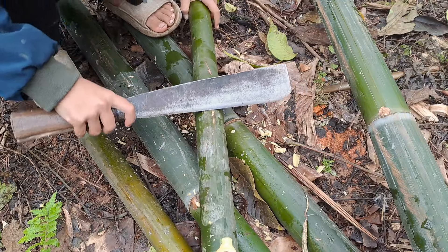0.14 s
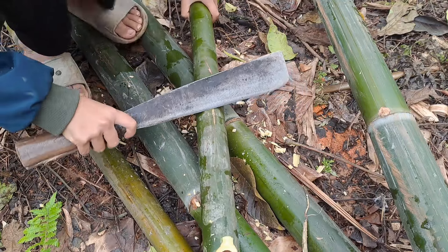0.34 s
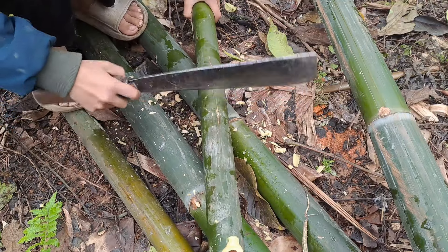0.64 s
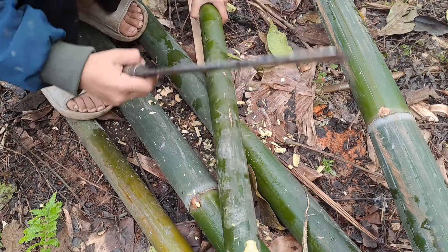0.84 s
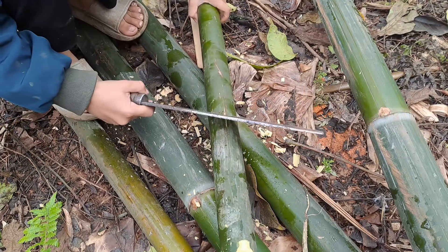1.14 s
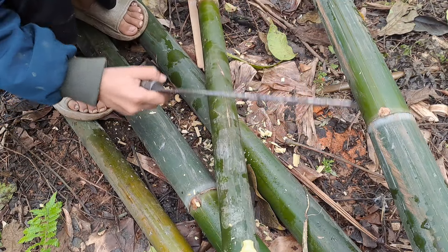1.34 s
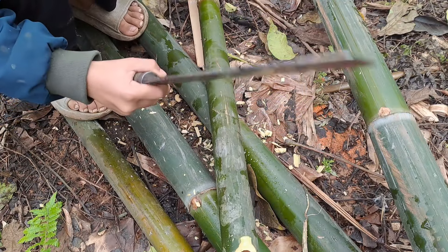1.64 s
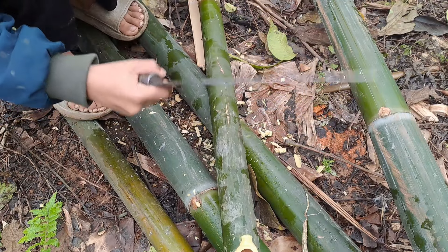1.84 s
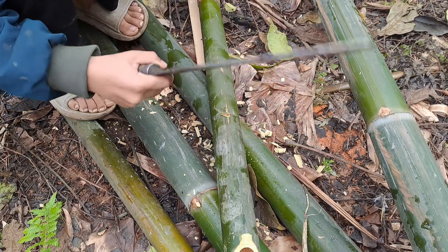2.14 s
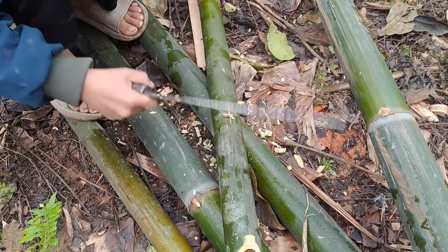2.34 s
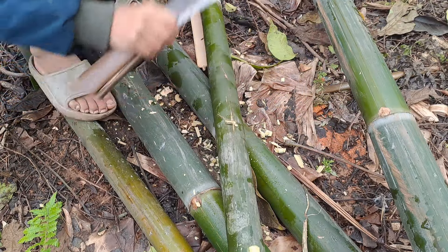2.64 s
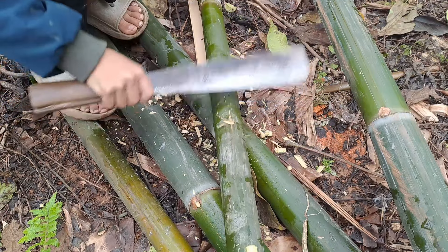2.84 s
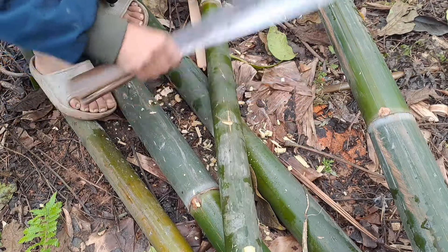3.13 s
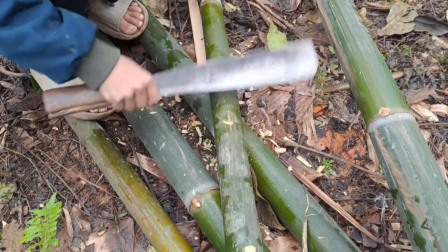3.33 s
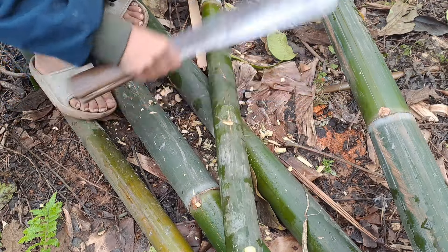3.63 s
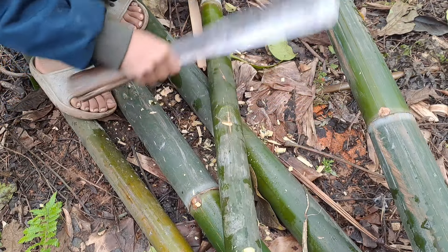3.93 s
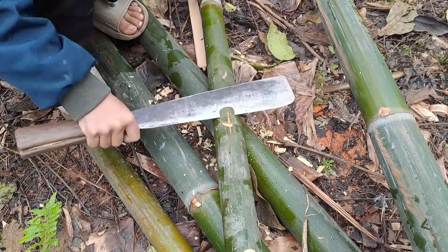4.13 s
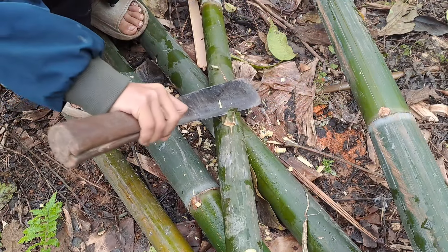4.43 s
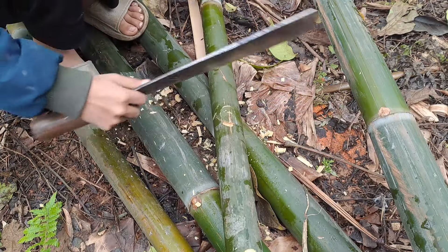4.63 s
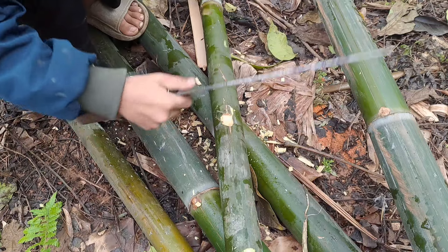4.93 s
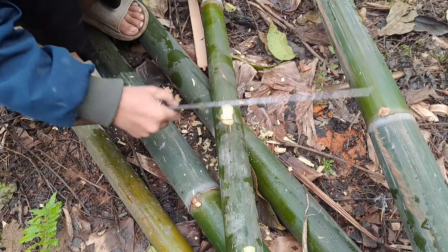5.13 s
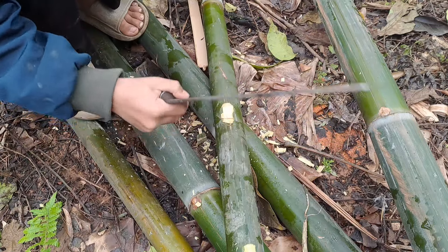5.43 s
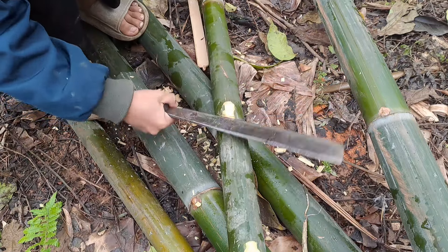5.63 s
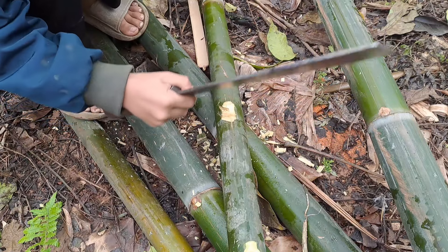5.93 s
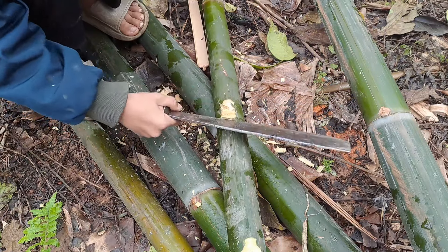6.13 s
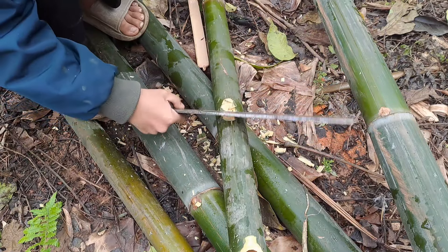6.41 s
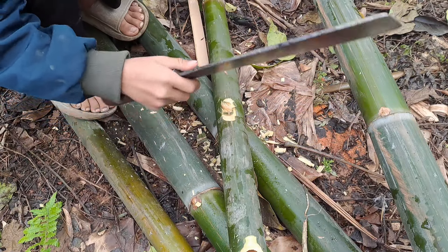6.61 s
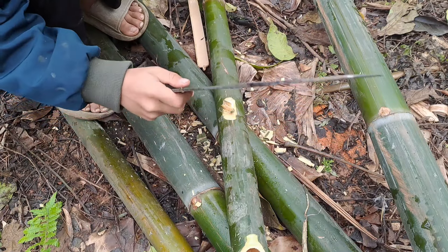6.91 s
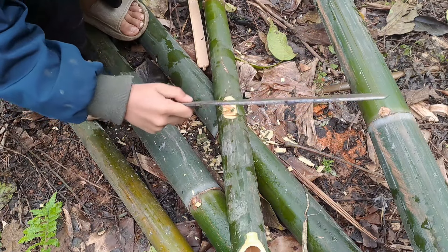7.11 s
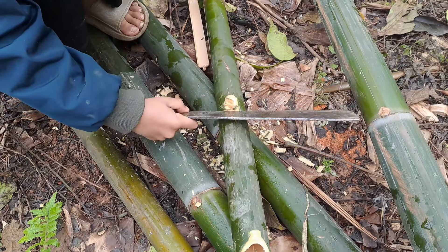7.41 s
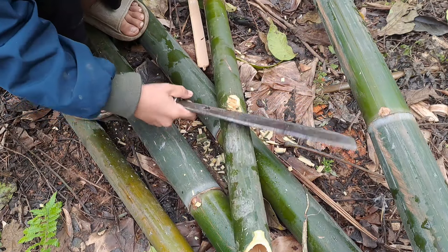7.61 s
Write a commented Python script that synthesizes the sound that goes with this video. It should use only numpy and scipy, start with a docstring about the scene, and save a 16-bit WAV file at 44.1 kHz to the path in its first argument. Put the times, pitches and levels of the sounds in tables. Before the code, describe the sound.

Close outdoor chopping on leafy ground. After a second of faint sleeve rustle, dull rubs, a soft low bump and small ticks, a machete strikes a green bamboo pole in fast runs of sharp, hollow, splintering knocks. Brief pauses bring bright blade scrapes and snapping chips. The last three blows are crisp and loud. The microphone is near, in stereo, with very quiet air and almost no echo.

```python
"""On leafy ground outdoors, close by, a machete chops a notch into a green bamboo pole lying on others.
Each blow is a swelling noise rush, a minimum-phase crack, damped modes of the hollow wall, a low hum
and decaying splinter noise. Between blows, shaped noise gives rubs, scrapes and ticking chips.
Soft cloth noise and very quiet air lie beneath."""
import sys
import numpy as np
from scipy import signal
from scipy.fft import rfft, irfft
from scipy.io import wavfile

SR = 44100
rng = np.random.default_rng(int(sys.argv[2]) if len(sys.argv) > 2 else 0)


def persist_wave(psi):
    """Save psi, clipped to +-1, as 16-bit WAV."""
    counts = np.round(np.clip(psi, -1, 1) * 32767).astype(np.int16)
    wavfile.write(sys.argv[1], SR, np.atleast_2d(counts).T)


N = 342216  # samples in the scene
SPAN = 2 ** 14  # samples in one event
AGE = np.arange(SPAN) / SR  # seconds since the event began
TOUCH_DB = 3.1  # scale of the unevenness of the dense resonances


def undb(db):
    """Logarithmic level: decibels become an amplitude gain."""
    return np.exp(np.log(10) / 20 * np.asarray(db))


def unit(x):
    """Power normalisation: scale to rms 1."""
    return x / np.sqrt(np.mean(x ** 2))


def fade(t60):
    """Exponential damping: the level falls 60 dB in t60 seconds."""
    return np.exp(-np.log(1000) * AGE / max(t60, 1e-3))


def bins(size):
    """Discrete spectrum: its frequencies in Hz, kept above zero for logarithms."""
    return np.maximum(np.arange(size // 2 + 1) * SR / size, 1)


def outline(points, size, tilt_db=0):
    """Spectral envelope: gain interpolated over octaves, plus a tilt in dB per octave."""
    hz, db = np.transpose(points)
    octave = np.log2(bins(size))
    return undb(np.interp(octave, np.log2(hz), db) + tilt_db * octave)


def noise(points, tilt_db=0, size=SPAN, alike_hz=650):
    """Interaural coherence: coloured noise alike at both ears in the bass, unrelated in the treble."""
    mid, side = rfft(rng.standard_normal((2, size))) * outline(points, size, tilt_db)
    side = side / np.sqrt(1 + (alike_hz / bins(size)) ** 2)
    return unit(irfft([mid + side, mid - side], size))


def grain(rate_hz, depth_db):
    """Random amplitude modulation: a gain that wanders unevenly between random levels."""
    steps = np.arange(SPAN // 8)
    level_db = depth_db * np.interp(AGE * rate_hz, steps, rng.standard_normal(len(steps)))
    return unit(undb(level_db))


def ripple(x, width_hz, depth_db):
    """Modal overlap: dense resonances of blade and pole, different at every point of contact."""
    peaks = rng.standard_normal((2, SPAN // 8))
    shape = np.array([np.interp(bins(SPAN) / width_hz, np.arange(len(p)), p) for p in peaks])
    # each ear hears its own pattern and part of the other's
    heard = (shape + np.sum(shape, axis=0)) / 2
    return unit(irfft(rfft(x) * undb(depth_db * heard), SPAN))


def resonate(x, hz, lift_db=6, width_hz=160):
    """Resonance: lift one narrow band."""
    band = 1 / (1 + 2j * (bins(SPAN) - hz) / width_hz)
    return unit(irfft(rfft(x) * (1 + (undb(lift_db) - 1) * band), SPAN))


def ring(hz, t60, build_s=0.0041):
    """Damped oscillation: a low resonance of the pole that takes a moment to build up."""
    return np.sin(2 * np.pi * hz * AGE) * fade(t60) * (1 - np.exp(-AGE / build_s))


def delayed(x, s):
    """Propagation delay: the same sound s seconds later."""
    return np.interp(AGE - s, AGE, x, left=0)


def add(out, s, sound):
    """Superposition: mix a sound in at time s."""
    start = int(round(s * SR))
    a, b = max(start, 0), min(start + SPAN, N)
    out[:, a:b] += sound[..., a - start:b - start]


# colour of the outdoor air: pitch_hz [Hz], level_db [dB per Hz, relative]
AIR_COLOUR = [(30, -19.5), (70, -4.5), (160, 1), (600, -16), (1500, -10), (3000, -18), (5200, -9.5),
              (8000, -18), (12000, -21.5), (16000, -26.5)]


def air(level_db=-74.5):
    """Stationary random noise: the very quiet outdoor air."""
    return undb(level_db) * noise(AIR_COLOUR, size=N)


# swishes as the arm reaches or changes grip: middle_s [s], fall to 1/e on either side_s [s], level_db [dB]
SLEEVE_MOVES = [(0.22, 0.27, -67.5), (1.0, 0.51, -67), (3.188, 0.07, -67), (4.28, 0.33, -63),
                (4.88, .17, -66.5), (6.25, 0.56, -71), (7.15, .08, -67.5), (7.7, .08, -63)]
# colour of the cloth: pitch_hz [Hz], level_db [dB per Hz, relative]
CLOTH_COLOUR = [(100, -12.5), (1400, -4.5), (3000, -8), (5400, -2.5), (8000, -7), (16000, -10)]


def sleeve():
    """Friction noise: cloth under Gaussian swells, one for each move of the arm."""
    t = np.arange(N) / SR
    swells = 0
    for s, side_s, db in SLEEVE_MOVES:
        swells = swells + undb(db) * np.exp(-np.minimum(((t - s) / side_s) ** 2, 20))
    return swells * noise(CLOTH_COLOUR, size=N)


# colour of scrapes and snaps: pitch_hz [Hz], level_db [dB per Hz, relative, before the tilt]
SCRAPE_COLOUR = [(60, -21.5), (200, -10), (400, -4.5), (750, -3), (1700, -4), (2500, -6.5), (4000, -8),
                 (6800, -10), (9000, -14.5), (12500, -13.5), (16000, -23.5)]


def strokes(rows):
    """Frictional excitation: gritty strokes, each with a sech swell of its length at half height."""
    out, middle = np.zeros((2, N)), AGE[-1] / 2
    for s, length, db, tilt in rows:
        grit = grain(4000, 4.5) * grain(300, 2.5)
        stroke = ripple(noise(SCRAPE_COLOUR, tilt), width_hz=190, depth_db=TOUCH_DB) * grit
        swell = 1 / np.cosh(2.59 * (AGE - middle) / length)
        add(out, s - middle, undb(db) * stroke * swell)
    return out


# dull rubs of the pole on its neighbours and the leaves: middle_s [s], length_s [s], level_db [dB]
POLE_RUB_STROKES = [(0.109, 0.045, -61.5), (0.244, 0.023, -56), (.333, 0.033, -45.5), (0.459, 0.057, -52),
                    (0.52, 0.027, -53.5), (0.76, 0.043, -41), (0.82, 0.043, -41), (1.066, 0.029, -59),
                    (1.297, 0.03, -54.5), (2.455, 0.013, -45), (6.513, 0.019, -38.5)]


def pole_rubs(tilt_db=0):
    """Sliding friction: the pole rubs on its neighbours and the leaves."""
    return strokes([(s, length, db, tilt_db) for s, length, db in POLE_RUB_STROKES])


# bright scrapes of the blade as it is turned and levered in the notch:
# middle_s [s], length_s [s], level_db [dB], brightness tilt_db [dB per octave]
BLADE_STROKES = [(2.438, 0.05, -46, 4.5), (3.191, 0.1, -57, 7), (4.289, 0.03, -44.5, 3.5),
                 (4.411, 0.31, -59.5, 3.5), (4.54, 0.039, -40.5, 3.5), (5.705, 0.011, -34, 5.5),
                 (5.751, 0.045, -35.5, 2), (6.012, 0.022, -39, 9), (6.499, .05, -52, 5),
                 (7.531, 0.078, -51.5, 4), (7.721, 0.079, -46, 2.5)]


def blade_scrapes():
    """Sliding friction: the blade scrapes brightly in the notch."""
    return strokes(BLADE_STROKES)


def pole_bump(start_s=0.326, hz=223, t60=0.066, level_db=-24):
    """Impulse response of a damped mode: the pole settles on the ground."""
    out = np.zeros((2, N))
    add(out, start_s, undb(level_db) * ring(hz, t60, build_s=0.018))
    return out


# ticks of chips landing: start_s [s, before the lag], level_db [dB, before the trim]
CHIP_TICKS = [(0.075, -44.5), (0.5045, -36.5), (0.722, -34.5), (0.777, -23), (0.9352, -31), (1.6858, -42.5),
              (3.1116, -32), (3.6205, -42), (4.3065, -33), (4.346, -34.5), (4.992, -44), (5.805, -26.5),
              (6.5096, -34), (7.5568, -22)]


def chip_ticks(trim_db=-8.5, t60=0.037, lag_s=0.0021):
    """Small impacts: each chip thrown off lands with a bright noise burst that dies away at once."""
    out = np.zeros((2, N))
    for s, db in CHIP_TICKS:
        add(out, s + lag_s, undb(db + trim_db) * noise(SCRAPE_COLOUR, tilt_db=5.0) * fade(t60))
    return out


# chops: start_s [s, before the contact lag], then levels [dB, before each layer's trim]:
# crack_db, hum_db, knock_db, splinter_db, drag_db (blade leaving the cut, no trim);
# and the pitch of each blow's lifted noise band, band_hz [Hz]
CHOP_BLOWS = [(1.163, -17, -42, -38, -39.5, -79, 2660), (1.554, -10.5, -28, -15.5, -21.5, -69.5, 6330),
              (1.776, -8.5, -27.5, -19.5, -22, -69.5, 5150), (2.006, -14, -30.5, -26.5, -24.5, -58, 2620),
              (2.294, -14, -26.5, -23.5, -27.5, -57.5, 2640), (2.817, -12.5, -29, -13, -22.5, -76.5, 2190),
              (3.055, -36, -28, -24, -20.5, -58.5, 2100), (3.299, -8, -30.5, -17.5, -23.5, -75.5, 2940),
              (3.535, -9, -31.5, -15.5, -22, -70.5, 2900), (3.802, -14.5, -42, -18.5, -25, -56.5, 2740),
              (4.091, -9.5, -38, -20, -21, -73, 3000), (4.876, -8.5, -26, -21, -22, -65, 3180),
              (5.095, -11.5, -40.5, -21.5, -27, -76, 6600), (5.316, -13, -40, -25.5, -25, -76, 2580),
              (5.558, -9, -28, -18, -20, -50.5, 3500), (6.052, -27, -30.5, -33, -21.5, -54, 2600),
              (6.366, -29, -25.5, -31.5, -22, -55, 4070), (6.735, -11, -27, -21.5, -22.5, -73.5, 2450),
              (7.023, -7.5, -43, -34.5, -22.5, -44, 2600), (7.27, -5.5, -52, -20.5, -23, -87, 4340)]


def blade_drags(lag_s=0.095, length_s=0.03, tilt_db=4.5):
    """Sliding friction: the blade is drawn out a moment after each blow."""
    return strokes([(s + lag_s, length_s, db, tilt_db) for s, *_, db, _ in CHOP_BLOWS])


# colour of the rush: pitch_hz [Hz], level_db [dB per Hz, relative, before the tilt]
RUSH_COLOUR = [(40, -19.5), (130, -0.5), (280, -12), (700, -1.5), (1400, 0), (2800, -5.5), (5000, -7.5),
               (6800, -4.5), (8500, -14.5), (13000, -12), (16000, -20)]


def rush(tilt_db, band_hz, length_s=0.029, release_s=0.0093):
    """Swelling broadband noise: a gritty rush up to the crack; returns its length and sound."""
    release = undb(-60 * np.maximum(AGE - length_s, 0) / release_s)
    swell = np.sin(np.pi / 2 * np.minimum(AGE / length_s, 1)) ** 2 * release
    grit = grain(1500, 3.6) * ripple(noise(RUSH_COLOUR, tilt_db), width_hz=130, depth_db=TOUCH_DB)
    return length_s, swell * resonate(grit, band_hz)


# spectrum of the crack: pitch_hz [Hz], level_db [dB, relative]
CRACK_COLOUR = [(40, -12), (300, 1), (900, -12), (2000, -9.5), (4000, -7), (7000, -11), (9000, -25),
                (16000, -38)]


def crack():
    """Minimum phase: the folded cepstrum gives one sharp causal pressure pulse with peak 1."""
    hz, db = np.transpose(CRACK_COLOUR)
    log_gain = np.log(10) / 20 * np.interp(np.log(bins(SPAN)), np.log(hz), db)
    cepstrum = irfft(log_gain, SPAN)
    causal = rfft(cepstrum[:SPAN // 2], SPAN)
    pulse = irfft(np.exp(2 * causal) / np.exp(cepstrum[0]), SPAN)
    return -pulse / np.abs(pulse).max()


# modes of the hollow wall: pitch_hz [Hz, before detuning], level_db [dB, relative], t60_s [s]
WALL_MODES = [(222, -9.5, 0.2), (255.7, -12, 0.057), (382.7, -10.5, 0.068), (485, 0, 0.073),
              (620, -10.5, 0.072), (732, 3.5, 0.046), (779.5, -1.5, 0.011), (950, -5, 0.026),
              (1140, -9, 0.026), (1190, -9, 0.021), (1372, -6.5, 0.065), (1556, -12.5, 0.073),
              (1629, -9.5, 0.068), (2000, -20, 0.048), (2540, -11, 0.085), (3317, -12.5, 0.048),
              (3300, -20, 0.035)]


def knock(centre_hz, scatter_db=2, detune=0.02, focus_db=1.5, ear_phase=0.3,
          rebound_s=0.011, rebound=0.55, build_s=0.00023):
    """Modal synthesis: wall modes weighted around centre_hz; low ones repeat as the pole hits those beneath."""
    hz, db, t60 = np.transpose(WALL_MODES)
    size, pitch, phase, side = rng.standard_normal((4, len(hz)))
    gain = undb(db + scatter_db * size - focus_db * np.log2(hz / centre_hz) ** 2)
    hz = hz * (1 + detune * pitch)
    modes = np.array([-g * fade(t) * np.exp(2j * np.pi * f * AGE) for g, t, f in zip(gain, t60, hz)])
    ears = []
    # the bending wall radiates to each ear with its own phase
    for sign in (1, -1):
        turn = np.exp(1j * (phase + sign * ear_phase * side))
        heard = (turn[:, None] * modes).real
        low = heard[hz < 1000].sum(axis=0)
        ears.append(heard.sum(axis=0) + rebound * delayed(low, rebound_s))
    return np.array(ears) * (1 - np.exp(-AGE / build_s)) / np.linalg.norm(gain)


def hum(t60, centre_hz=152.4, spread=0.0091, waver_db=1.25, choke_s=0.21):
    """Added damping: the lowest ring varies a little at random in pitch and level; its end is damped faster."""
    hz = centre_hz * (1 + spread * rng.standard_normal())
    return ring(hz, t60) * grain(37, waver_db) * np.exp(-(AGE / choke_s) ** 2)


def overtone():
    """Higher mode: the odd overtone of the pole."""
    return ring(459, 0.16)


def thud():
    """Segment resonance: the hollow length under the edge thuds."""
    return ring(368, 0.071, build_s=0.002)


# colour of the splinters: pitch_hz [Hz], level_db [dB per Hz, relative, before the tilt]
SPLINTER_COLOUR = [(100, -14.5), (330, -1), (800, 6), (1500, -0.5), (3000, -7.5), (6500, -9.5), (8500, -15),
                   (13000, -17.5), (16000, -28.5)]


def splinters(tilt_db, band_hz):
    """Fracture noise: grainy noise of breaking fibres, with one narrow band lifted."""
    fibres = noise(SPLINTER_COLOUR, tilt_db, alike_hz=1000)
    return resonate(ripple(fibres, width_hz=140, depth_db=TOUCH_DB) * grain(1800, 3.5), band_hz)


# colour of the scatter from the surroundings: pitch_hz [Hz], level_db [dB per Hz, relative]
TAIL_COLOUR = [(60, -1.5), (200, 7.5), (500, -2.5), (900, -3.5), (1600, -3), (3000, -8), (6000, -10),
               (8500, -16.5), (12000, -17.5), (16000, -23.5)]


def tail():
    """Diffuse scattering: a faint decaying noise from the surroundings."""
    return ripple(noise(TAIL_COLOUR), width_hz=63, depth_db=TOUCH_DB) * fade(0.25)


# typical levels before the trims, from which hardness and freedom are counted
TYPICAL_KNOCK_DB, TYPICAL_HUM_DB = -21, -30
# a harder knock is brighter: centre at the typical level, and its rise
KNOCK_HZ, KNOCK_OCTAVES_PER_DB = 640, 0.1565
# a pole that lies freely hums louder and longer: t60 before the added damping, and its growth
HUM_T60_S, HUM_DOUBLINGS_PER_DB = 0.36, 0.04
# a glancing blow knocks less and rings the overtone more: dB above the splinters, dB per dB of knock
OVERTONE_DB, OVERTONE_SLOPE = -13.5, -0.064
# a firmly held pole hums less and thuds more: dB above the splinters, dB per dB of hum
THUD_DB, THUD_SLOPE = -8.5, -0.45


def chops(contact_s=0.0018, crack_db=2, rush_db=-5.5, burst_db=-12, splinter_db=-4,
          splinter_lag_s=0.0003, knock_db=1, hum_db=0, tail_db=-20,
          tilt_db=0.15, brightening_db_per_s=0.05):
    """Impact excitation: each blow sums rush, crack, wall knock, low rings, splinters and scatter."""
    out, pulse = np.zeros((2, N)), crack()
    for s, peak, low, wall, fibres, _, band_hz in CHOP_BLOWS:
        s = s + contact_s
        freedom, hardness = low - TYPICAL_HUM_DB, wall - TYPICAL_KNOCK_DB
        centre_hz = KNOCK_HZ * 2 ** (KNOCK_OCTAVES_PER_DB * hardness)
        hum_t60 = HUM_T60_S * 2 ** (HUM_DOUBLINGS_PER_DB * freedom)
        # the fibres sound brighter as the notch deepens (dB per octave)
        tilt = tilt_db + brightening_db_per_s * s
        lead, swell = rush(tilt, band_hz)
        add(out, s - lead, undb(fibres + rush_db) * swell)

        direct = undb(peak + crack_db) * pulse
        direct = direct + undb(low + hum_db) * hum(hum_t60)
        direct = direct + undb(fibres + OVERTONE_DB + OVERTONE_SLOPE * hardness) * overtone()
        direct = direct + undb(fibres + THUD_DB + THUD_SLOPE * freedom) * thud()
        # the right ear hears these two samples later
        add(out, s, np.array([direct, np.roll(direct, 2)]))
        add(out, s, undb(wall + knock_db) * knock(centre_hz))

        # a clean cut breaks most fibres at once; the rest give way later
        breaking = undb(peak + burst_db) * fade(0.023) + undb(fibres + splinter_db) * fade(0.057)
        add(out, s + splinter_lag_s, splinters(tilt, band_hz) * breaking)
        add(out, s, undb(fibres + tail_db) * tail())
    return out


def scene():
    """Superposition: air, sleeve, handling of pole and blade, and the chops."""
    handling = pole_rubs() + blade_scrapes() + pole_bump() + chip_ticks() + blade_drags()
    return air() + sleeve() + handling + chops()


# left minus right: pitch_hz [Hz], level_db [dB]
EAR_BALANCE = [(150, -2.5), (400, 0.5), (1000, -2.5), (1700, 1.5), (3000, -2), (6000, -0.5), (8000, 2.5),
               (15000, 3.5)]


def record(dry, low_cut_hz=85, ceiling=1.0, top_hz=16000):
    """Linear filtering and saturation: coloured ports, thinned bass, rounded peaks, a steep top cut."""
    ports = []
    for x, sign in zip(dry, (1, -1)):
        colour = [(hz, sign * db / 2) for hz, db in EAR_BALANCE]
        ports.append(irfft(rfft(x) * outline(colour, N), N))
    ports = signal.sosfilt(signal.butter(2, low_cut_hz, "high", fs=SR, output="sos"), ports)
    ports = ceiling * np.tanh(ports / ceiling)
    return signal.sosfilt(signal.ellip(10, 0.1, 80, top_hz, fs=SR, output="sos"), ports)


dry = scene()
out = record(dry)
persist_wave(out)
```